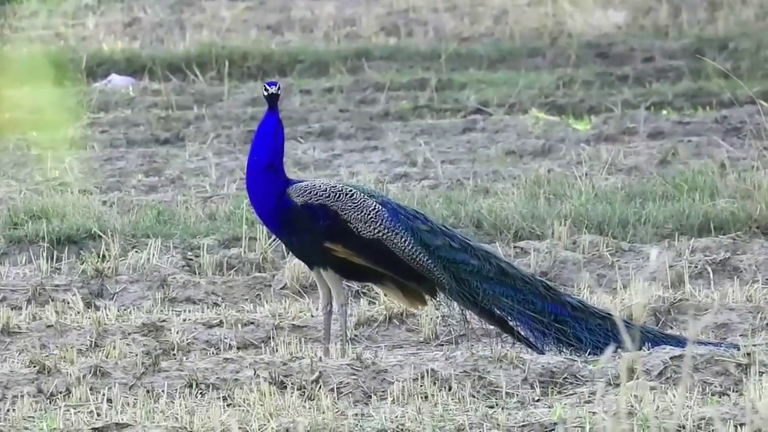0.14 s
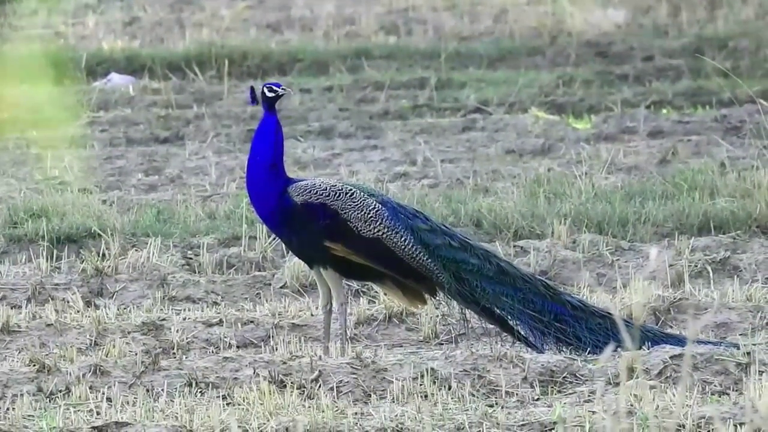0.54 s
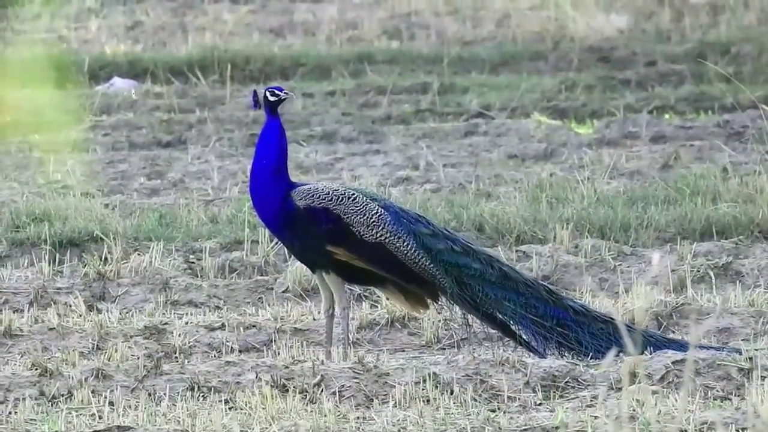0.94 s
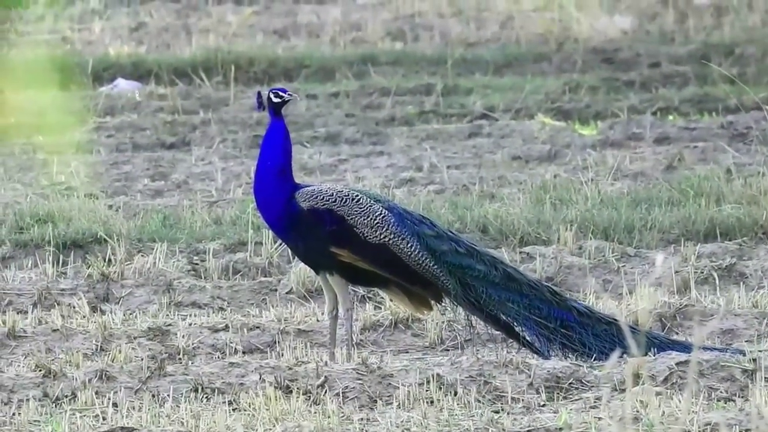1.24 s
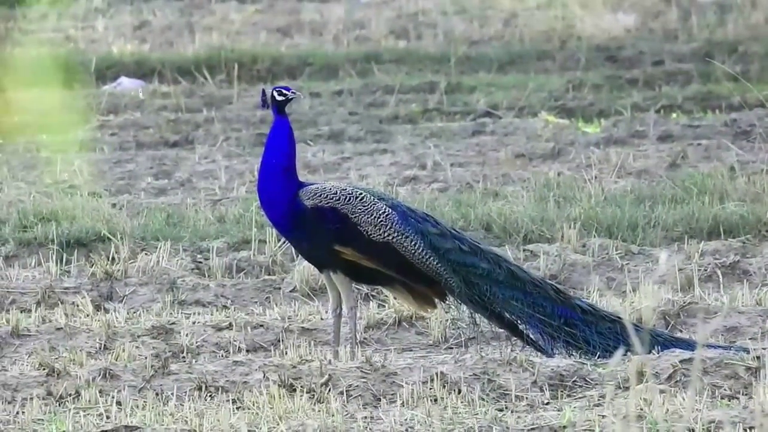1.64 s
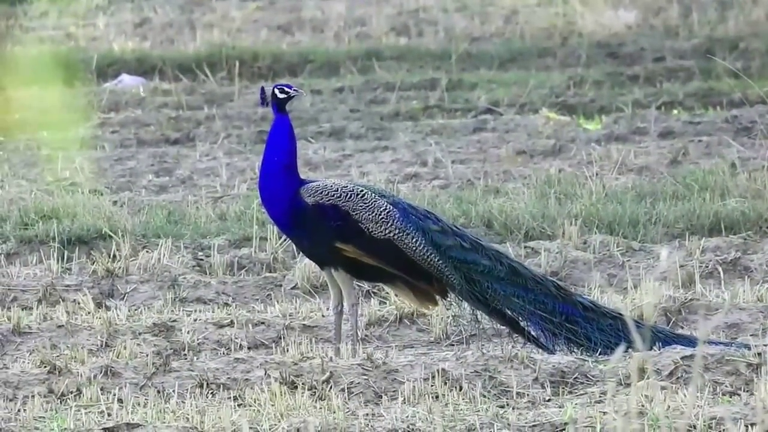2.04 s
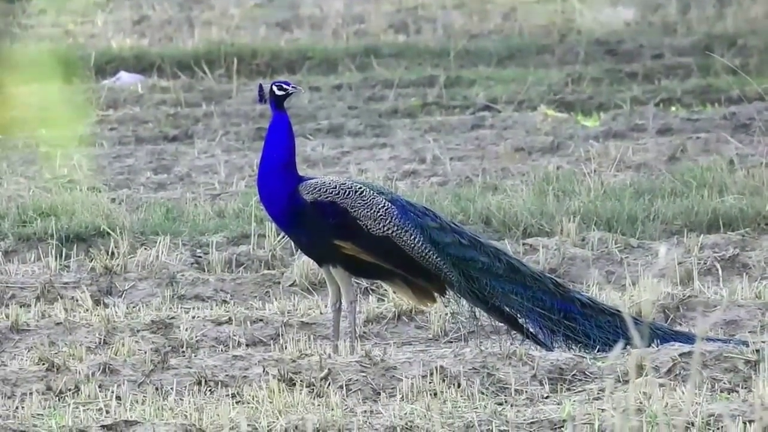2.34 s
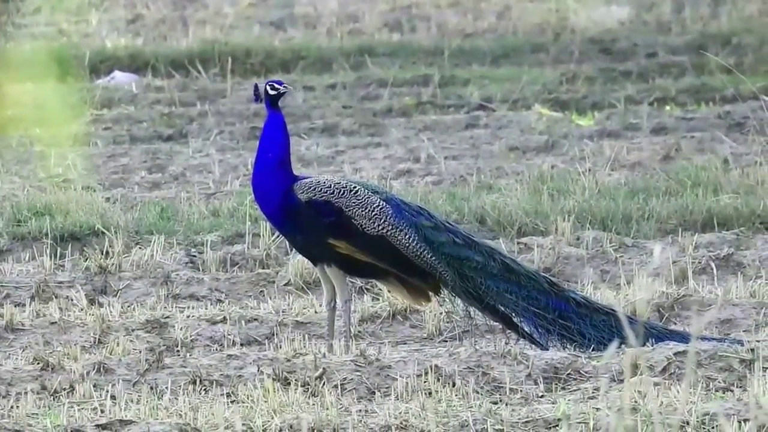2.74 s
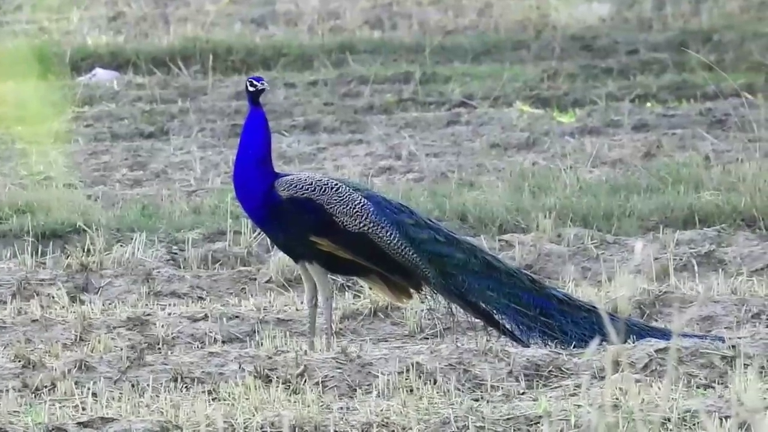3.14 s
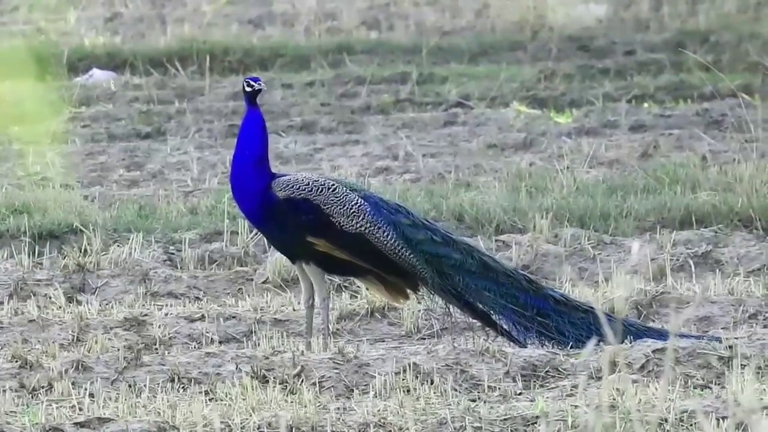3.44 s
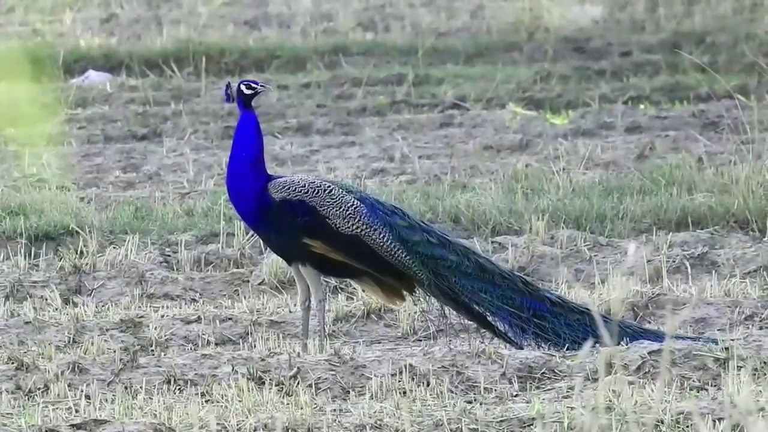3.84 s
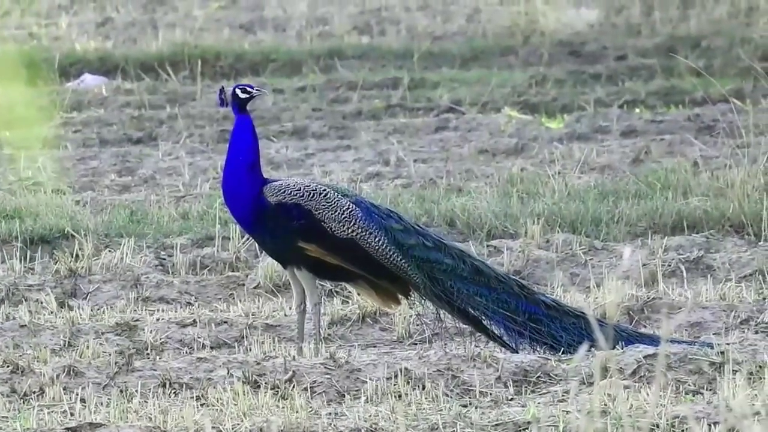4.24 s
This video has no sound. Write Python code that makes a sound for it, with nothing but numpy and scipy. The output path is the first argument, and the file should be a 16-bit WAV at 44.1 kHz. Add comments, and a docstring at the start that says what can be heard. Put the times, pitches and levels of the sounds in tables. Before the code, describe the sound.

Soft hiss and low rumble of open air, with a distant motor throbbing and small birds whistling. Two peacocks cry twice, the far one first, the near one strongly over it, each going from open 'ay' to rounded 'aw'. A long reverberant tail follows, with small dry ticks and sparse chirps. Distant outdoor stereo microphone.

```python
"""Airy hiss, a low rumble, a distant throbbing motor and small birds are heard throughout an open dry field,
while two peacocks call, a far one leading and a near one joining in, twice over; each call is a stack of
partials recoloured as the throat moves. A dull knock and dry ticks are short blows of filtered noise.
The field's edges return a long echo, made by convolving the birds with dying noise."""
import sys
import numpy as np
from scipy import signal
from scipy.fft import rfft, irfft, next_fast_len
from scipy.io import wavfile
from scipy.ndimage import uniform_filter1d, map_coordinates

SR = 44100
rng = np.random.default_rng(int(sys.argv[2]) if len(sys.argv) > 2 else 0)


def pcm_store(signal):
    """Save signal as 16-bit PCM."""
    levels = np.round(np.clip(np.atleast_2d(signal), -1, 1) * 32767)
    wavfile.write(sys.argv[1], SR, levels.astype(np.int16).T)


N = 193775


def amp(db):
    """Amplitude factor for a level in dB."""
    return 10 ** (np.asarray(db) / 20)


def unit(x):
    """Scale to an rms of 1."""
    return x / np.sqrt(np.mean(x ** 2) + 1e-20)


def along(points, hz):
    """Read (hz, value) points on a logarithmic frequency axis."""
    point_hz, value = np.transpose(points)
    return np.interp(np.log(hz + 1), np.log(point_hz + 1), value)


def curves(rows):
    """One value per sample for each column after the time."""
    time_s, *columns = np.transpose(rows)
    return [np.interp(np.arange(N) / SR, time_s, column) for column in columns]


def wobble(rate):
    """A smooth random curve through rate knots a second."""
    knots = rng.standard_normal(int(N * rate / SR) + 4)
    return map_coordinates(knots, [np.arange(N) * rate / SR])


def filtered(x, response):
    """Multiply the spectrum of x by a response of frequency."""
    size = next_fast_len(N + SR // 2)
    spectrum = rfft(x, size) * response(np.fft.rfftfreq(size, 1 / SR))
    return irfft(spectrum, size)[..., :N]


def rush(gain, patchy_db):
    """Stereo noise of rms 1, patchy in time and pitch, with sides as alike as the table says."""
    # likeness of left and right: hz, correlation (0-1)
    likeness = [(60, 0.83), (180, 0.65), (540, 0.58), (1640, 0.63), (4940, 0.14), (14900, 0.062)]
    z = signal.stft(rng.standard_normal((2, N)), nperseg=512)[2]
    patches = uniform_filter1d(rng.standard_normal(z.shape[1:]), 6, 0)
    patches = unit(uniform_filter1d(patches, 14, 1))
    pair = signal.istft(z * amp(patchy_db * patches), nperseg=512)[1][:, :N]

    def mid_side_gain(hz):
        angle = np.arccos(np.clip(along(likeness, hz), -1, 1)) / 2
        return gain(hz) * [np.cos(angle), np.sin(angle)]

    mid, side = filtered(pair, mid_side_gain)
    return unit(np.array([mid + side, mid - side]))


def bell(hz, centre_hz, width_hz):
    """A steep-sided resonance."""
    return 1 / (1 + (2 * (hz - centre_hz) / width_hz) ** 4)


def tone(hz, gain):
    """A sine on a moving pitch; gain is its rms."""
    return np.sqrt(2) * gain * np.sin(2 * np.pi * np.cumsum(hz) / SR)


def air():
    """Three bands of patchy noise: a rumble, a murmur above it and a wide hiss, each drifting in level."""
    # levels over time: start_s, murmur_db, rumble_db
    air_levels = [(0, -55, -49.5), (.37, -63, -51.5), (.85, -56.5, -49), (1.3, -61.5, -49.5),
                  (2.15, -60, -48.5), (3.25, -52, -48), (3.7, -60, -52), (4.39, -52.5, -48)]
    # spectral shapes before levelling: hz, density_db (per Hz)
    rumble_shape, murmur_shape, hiss_shape = [(15, -55.5), (25, -28), (45, -8), (66, -0.5), (140, -2.5),
                                              (200, -5.5), (260, -16), (400, -60.5), (900, -120)], [(90, -64), (180, -13.5), (240, 0.5),
                                                              (340, -1.5), (480, -10.5), (700, -38),
                                                              (1500, -120)], [(200, -42), (400, -9.5),
                                                                              (550, -4), (680, 1),
                                                                              (850, -2.5), (1180, -6),
                                                                              (1580, -6.5), (2680, -8.5),
                                                                              (4680, -12.5), (6730, -15.5),
                                                                              (11000, -21), (15400, -28)]
    hiss_db = -51.5
    murmur_db, rumble_db = curves(air_levels)
    rumble = rush(lambda hz: amp(along(rumble_shape, hz)), patchy_db=1.0)
    murmur = rush(lambda hz: amp(along(murmur_shape, hz)), patchy_db=1.5)
    hiss = rush(lambda hz: amp(along(hiss_shape, hz)), patchy_db=1.85)
    out = amp(rumble_db + 1.1 * wobble(3.67)) * rumble
    out += amp(murmur_db + 0.17 * wobble(2.8)) * murmur
    return out + amp(hiss_db + 0.21 * wobble(1.27)) * hiss


def motor():
    """Two low drones of wavering pitch swell together in a steady throb."""
    # drone levels over time: start_s, lower_db, upper_db
    drone_levels = [(0, -54, -57.5), (.32, -53, -51.5), (.45, -58, -63.5), (.95, -51.5, -53.5),
                    (1.15, -53.5, -60), (1.44, -47.5, -50), (1.6, -52, -56.5), (2.05, -51.5, -54),
                    (2.14, -53, -45.5), (2.3, -51.5, -57.5), (2.75, -55, -59.5), (2.9, -66, -59),
                    (3.03, -51, -48.5), (3.15, -62, -59.5), (3.32, -65, -47.5), (3.5, -61, -62),
                    (4.39, -66, -59.5)]
    # lower, then upper drone: centre_hz, waver (share of pitch), throb_db (depth)
    drones = [(110.1, 0.036, 4), (171.8, 0.0497, 1.5)]
    throb_hz, throb_peak_s = 4.785, 1.44
    throb = np.cos(2 * np.pi * throb_hz * (np.arange(N) / SR - throb_peak_s))
    out = np.zeros(N)
    for level_db, (centre_hz, waver, throb_db) in zip(curves(drone_levels), drones):
        hz = centre_hz * (1 + waver * wobble(20))
        out += tone(hz, amp(level_db + throb_db * throb + 2.5 * wobble(18)))
    return out


def far_twitter():
    """Birds too far and blurred for notes: one band of very patchy noise."""
    return amp(-68 + 3 * wobble(7)) * rush(lambda hz: bell(hz, 2850, 800), patchy_db=4)


def ringing_haze():
    """A soft haze of noise in resonant bands, sinking until 2.6 s and then swelling again."""
    # level over time: start_s, level_db
    haze_levels = [(0, -46.5), (.4, -59), (2.6, -72.5), (3.3, -59), (3.8, -56), (4.39, -57)]
    # resonances: centre_hz, width_hz, level_db
    resonances = [(660, 37, -8), (1190, 170, -10.5), (1308, 120, -3), (1884, 59, -9.5)]

    def bands(hz):
        return sum(amp(db) * bell(hz, centre, width) for centre, width, db in resonances)

    return amp(curves(haze_levels)[0]) * rush(bands, patchy_db=-1.0)


def songbirds():
    """Small birds as gliding sines: one rising whistle repeated, and faint short notes."""
    # rising whistle: time_s (negative, before its end), pitch_hz, level_db (added to each whistle's own)
    whistle_shape = [(-.125, 3800, -39), (-.1, 3950, -3), (-.08, 4100, -4), (-.06, 4350, 4),
                     (-.03, 4650, 2), (-.012, 4950, 5), (-.006, 5300, -5), (0, 5800, -7)]
    # repeats of the whistle: end_s, level_db
    whistle_times = [(.268, -55), (1.525, -54), (2.152, -60), (2.849, -60), (4.04, -66)]
    # notes of other birds: start_s, length_s, first_hz, last_hz, level_db
    notes = [(0, 0.17, 1550, 2190, -53.5), (0, 0.21, 1750, 2250, -65), (0.118, 0.11, 2790, 2940, -72),
             (0.278, 0.052, 2800, 3100, -54.5), (0.716, 0.14, 3998, 4780, -53.5),
             (1.48, 0.13, 1010, 1043, -59), (1.487, 0.13, 1884, 1890, -51.5), (1.48, 0.1, 2790, 2773, -54),
             (1.475, 0.058, 4030, 4120, -70), (1.494, 0.094, 3650, 3680, -61),
             (2.494, 0.045, 2800, 2920, -59), (3.035, 0.039, 3076, 3163, -60),
             (3.179, 0.048, 3100, 3100, -58), (3.378, 0.041, 2190, 2194, -57),
             (3.551, 0.024, 2610, 2830, -60), (3.819, 0.062, 2800, 3110, -64),
             (4.007, 0.034, 2840, 2650, -55.5), (4.019, 0.044, 2780, 3108, -62),
             (4.291, .04, 2800, 2590, -60)]
    out, t = np.zeros(N), np.arange(N) / SR
    before, pitch_hz, shape_db = np.transpose(whistle_shape)
    for end, level_db in whistle_times:
        contour_db = np.interp(t - end, before, shape_db, -90, -90)
        gain = amp(level_db + contour_db + 3 * wobble(55))
        out += tone(np.interp(t - end, before, pitch_hz), gain)
    for start, length, first_hz, last_hz, level_db in notes:
        progress = np.clip((t - start) / length, 0, 1)
        glide_hz = first_hz + (last_hz - first_hz) * progress
        hz = glide_hz * (1 + .012 * wobble(120))
        blur = 1.0 + 0.45 * wobble(160)  # distance blurs them
        out += tone(hz, amp(level_db) * blur * np.sin(np.pi * progress) ** 0.24)
    return out


def echo(x):
    """Each frequency of the field's answer dies at its own speed; both sides hear much the same."""
    # decay of the far tail: hz, t60_s
    decay = [(300, 0.38), (700, 3.05), (1300, 4.93), (2500, 2.5), (6000, 0.56)]
    hz, t, z = signal.stft(rng.standard_normal((2, 3 * SR)), SR, nperseg=256)
    far_tail = amp(-60 * t / along(decay, hz)[:, None])
    near_scatter = 7.24 * amp(-60 * t / 0.23)
    tree_line = 1 + 0.32 * np.exp(-((t - .31) / 0.018) ** 2)  # a tree line answers late
    mid, side = signal.istft(z * (far_tail + near_scatter) * tree_line, SR, nperseg=256)[1]
    tail = np.array([mid + 0.27 * side, mid - 0.27 * side])
    tail /= np.linalg.norm(tail[0])
    delayed = np.pad(x, (600, 0))[None]  # samples of silence before the first answer
    return signal.fftconvolve(delayed, tail, axes=1)[:, :N]


def call(rows, flutter_db, lag_s):
    """A peacock's partials coloured by its throat; from the right, so the left side hears it lag_s later."""
    # throat postures 0-7, neighbours blending; a call may move back and forth among them: voice sets in,
    # brassy, bright, open "ay", turning, rounded "aw", muffled, hollow; columns partial_1_db to partial_6_db
    postures = [(-15, 2.5, -3.5, -14.5, -29.5, -31), (-5.5, -5.5, -3, -4, -2.5, -20.5),
                (-2.5, -3, -11.5, 1, -18.5, -25.5), (-4, -10.5, 1, -14.5, -34.5, -26.5),
                (-2.5, -4, -9, -2.5, -22, -24.5), (-22.5, -0.5, -27, -30.5, -36.5, -37),
                (-5.5, -0.5, -18.5, -28.5, -25.5, -34.5), (-0.5, -5.5, -18.5, -4, -24, -24)]
    # upper partials: partial (number), level_db (against the sixth)
    upper = [(7, -2.5), (8, -5), (9, -7), (10, -16), (11, -21.5)]
    hz, level_db, posture, boost_db, balance_db = curves(rows)
    t = np.arange(N) / SR
    first_s, last_s = rows[0][0], rows[-1][0]
    steps = np.arange(len(postures))
    levels = [level_db + np.interp(posture, steps, db) for db in np.transpose(postures)]
    # whenever the second partial outweighs the third, the top dulls
    excess_db = np.clip(levels[1] - levels[2], 0, 30)
    levels += [levels[-1] + db - 0.018 * (k - 6) * excess_db for k, db in upper]

    def smooth(curve):
        return uniform_filter1d(curve, size=700)

    sounding = np.clip(np.minimum(t - first_s + 0.0094, last_s + 0.01 - t) / 0.016, 0, 1)
    phase = 2 * np.pi * np.cumsum(smooth(hz) * (1 + 0.00083 * wobble(40.9))) / SR
    # the beak closes and the top goes first
    closing_db = np.clip((t - last_s + .045) / .045, 0, 1) * -14
    out = np.zeros((2, N))
    for k, db in enumerate(levels, 1):
        # the table's balance shades the second to the fourth partial only
        lean_db = balance_db * (1 < k < 5) + .5 * k * wobble(8.65)
        shade = np.array([.5, -.5])[:, None] * lean_db
        late = np.array([[-.5], [.5]]) * 2 * np.pi * k * hz * lag_s
        # moving air shakes each partial
        flutter = flutter_db * np.sqrt(k) * wobble(22) + 3 * (k > 4) * wobble(35)
        colour_db = smooth(db + (k > 4) * boost_db) + (k > 3) * closing_db
        wave = np.sin(k * phase + late + rng.uniform(0, 2 * np.pi))
        out += np.sqrt(2) * amp(colour_db + shade + flutter) * wave
    return sounding * out


def far_peacock():
    """Two calls from across the field, with little flutter."""
    # one table a call: start_s, pitch_hz, level_db, posture (0-7), boost_db (fifth partial up),
    # balance_db (left against right)
    far_calls = [
        [(.06, 521.5, -56, .1, 0, 2), (.11, 547, -46.5, .3, -13, -2.5), (.15, 578, -46, 1.85, 6.5, 1.5),
         (.22, 578, -39, 2.84, 1, -1.5), (.345, 606, -37.5, 3.03, -4, -1.5), (.39, 647, -35, 6.33, -8, -6.5),
         (.45, 660, -37, 6.1, 0, -4.5), (.55, 647.6, -35.5, 5.85, -2.5, -7.5), (.63, 626, -39.5, 5.4, -3, -9.5),
         (.68, 591, -33, 5.2, -10, 0.5), (.715, 537.4, -63.5, 7.3, 0.5, -5.5)],
        [(1.39, 536, -65, 0.25, 3, -11.5), (1.45, 561, -47, .8, -3, -8), (1.49, 583, -42.5, 1.8, 9.5, -1),
         (1.57, 588.3, -38.5, 2.69, -0.5, -9), (1.65, 592.4, -36, 2.99, 0.5, -2.5),
         (1.72, 629, -38.5, 3.93, 3, -3.5), (1.8, 660, -37.5, 6.55, 1.5, -12.5),
         (1.9, 652.6, -41.5, 6.2, 6.5, -12), (1.98, 618.4, -36.5, 5.4, -2, -12.5),
         (2.03, 591, -42, 5.3, 0, -5.5), (2.07, 532, -43, 5.9, -2, -3)],
    ]
    return sum(call(rows, flutter_db=0.24, lag_s=2.5e-5) for rows in far_calls)


def near_peacock():
    """Two louder calls from nearer the microphones, with more flutter."""
    # one table a call: start_s, pitch_hz, level_db, posture (0-7), boost_db (fifth partial up),
    # balance_db (left against right)
    near_calls = [
        [(.465, 553, -39.5, .05, -9, 1), (.487, 557, -35, .1, -2, -2), (.505, 571.6, -34, 0.87, 0.5, -1.5),
         (.53, 598.5, -33, 2.4, 3, -1), (.552, 612.3, -28.5, 2.25, 4.5, -1), (.6, 624, -23.5, 2.95, 0, -1),
         (.653, 623, -23.5, 2.97, 0, 1.5), (.747, 626.5, -25, 2.95, 3, 1.5), (.775, 632.5, -26.5, 3.7, 5, -1.5),
         (.805, 640.6, -24.5, 4.1, -1.5, -5.5), (.835, 649, -24, 4.75, 2.5, -6),
         (.885, 658.5, -17.5, 5.05, -5.5, -6.5), (.92, 653, -18, 4.7, -2, -5), (.955, 629, -20.5, 6, 0.5, -4),
         (.984, 592, -21, 5.34, 1.5, 0.5), (1.003, 528, -32.5, 4.8, 0, -3)],
        [(1.722, 543, -38, .2, -6, -4.5), (1.745, 553.5, -33.5, 0.17, -8, -5.5),
         (1.765, 567.3, -31.5, 1.1, -1, -5), (1.785, 598, -35, 2.1, 5.5, -4), (1.82, 617, -25, 2.11, -2, -3),
         (1.855, 624.2, -25.5, 3.4, -1.5, -2), (1.9, 625, -25.5, 3, -3, -6.5),
         (1.945, 629.8, -26, 3.65, 1, -7.5), (1.975, 646.2, -25.5, 4.33, -3.5, -7),
         (2.003, 654.8, -23, 4.64, 4.5, -8.5), (2.035, 675.7, -31, 7.7, -1.5, 1.5),
         (2.07, 682.5, -32, 6.79, -1.5, -6), (2.12, 676.3, -34.5, 7.06, 4, -8.5),
         (2.155, 670.4, -33.5, 6.5, 5, -2.5), (2.185, 662.2, -23, 5.09, 8.5, 0),
         (2.24, 655, -22.5, 5.33, 4.5, -3), (2.298, 640.3, -28, 5.6, 0, -12.5),
         (2.332, 624, -28.5, 6.1, -2.5, -2), (2.348, 555, -30.5, 4.77, -2, -8), (2.36, 544, -41, 5, 0, 2)],
    ]
    return sum(call(rows, flutter_db=1.18, lag_s=3e-5) for rows in near_calls)


def ticks():
    """A dull knock with a lead-in, then dry ticks: each one blow with a puff of noise, in a band."""
    # start_s, peak_db, low_hz, high_hz, t60_s (of the puff), balance_db (left against right)
    blows = [(.7475, -33, 380, 1500, .03, 0), (.7555, -26.5, 230, 430, .03, 0),
             (1.1137, -40, 4800, 7000, .004, -8), (3.1355, -47, 6200, 8200, .004, -6),
             (3.1408, -45, 6200, 8200, .006, 0), (3.194, -37, 5100, 6300, .012, 3),
             (3.1992, -47, 5300, 6800, .005, 3)]
    out, t = np.zeros((2, N + SR)), np.arange(SR // 20) / SR
    for start, peak_db, low_hz, high_hz, t60, balance_db in blows:
        b, a = signal.butter(1, [low_hz, high_hz], "band", fs=SR)
        puff = rng.standard_normal(len(t)) * amp(-60 * t / t60) / np.sqrt(t60 * SR / 8)
        blow = (t == 0) + puff
        burst = signal.lfilter(b, a, signal.lfilter(b, a, blow))
        burst /= np.abs(burst).max()
        gain = amp(peak_db + np.array([[.5], [-.5]]) * balance_db)
        out[:, round(start * SR):][:, :len(t)] += gain * burst
    return out[:, :N]


def scene():
    """Birds direct and echoed, with the ticks and the field's surroundings."""
    surroundings = air() + motor() + far_twitter() + ringing_haze()
    birds = songbirds()
    far, near = far_peacock(), near_peacock()
    wet = amp(-13.5) * near.mean(0) + amp(-5) * far.mean(0) + amp(-9.0) * birds
    wet = wet * (.6 + .8 * wobble(30))  # swaying leaves blur the pitch of what they return
    birds_stereo = birds * amp([[1.5], [-1.5]])
    return near + far + birds_stereo + ticks() + echo(wet) + surroundings


def record(dry):
    """Nothing is kept above the band limit."""
    top_hz = 15450
    return filtered(dry, lambda hz: hz < top_hz)


dry = scene()
out = record(dry)
pcm_store(out)
```